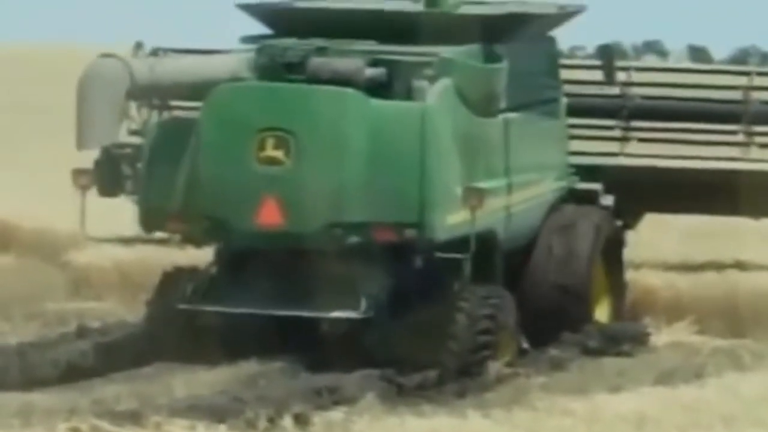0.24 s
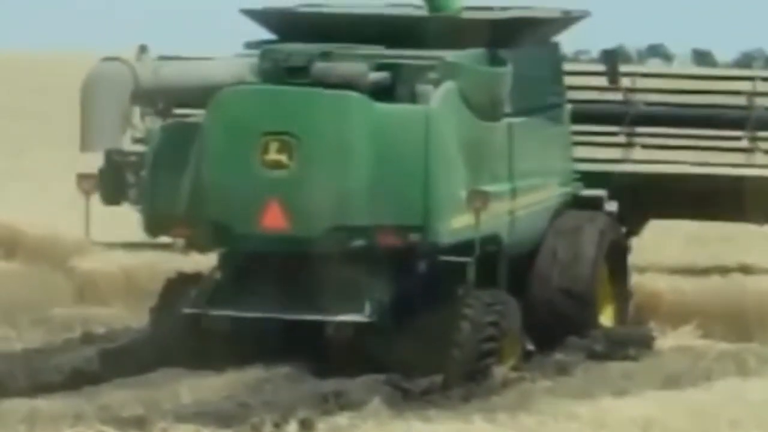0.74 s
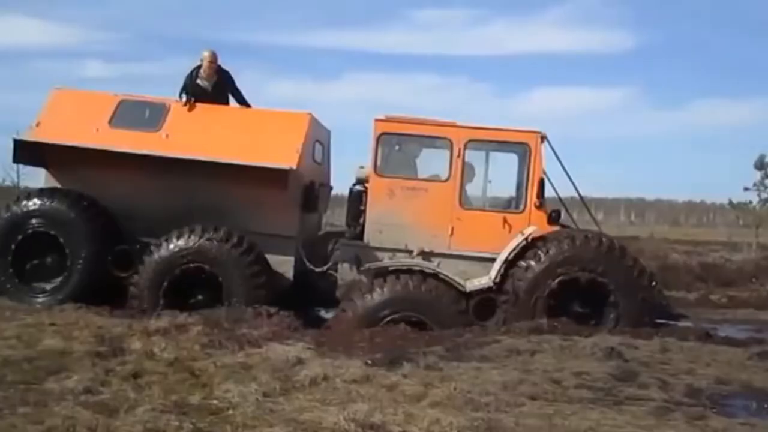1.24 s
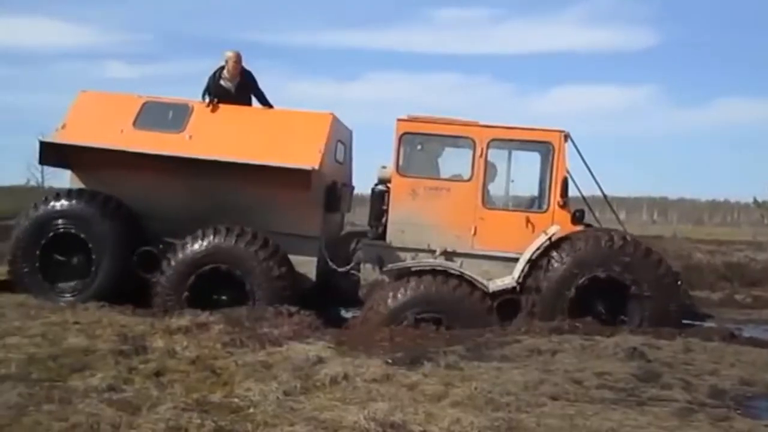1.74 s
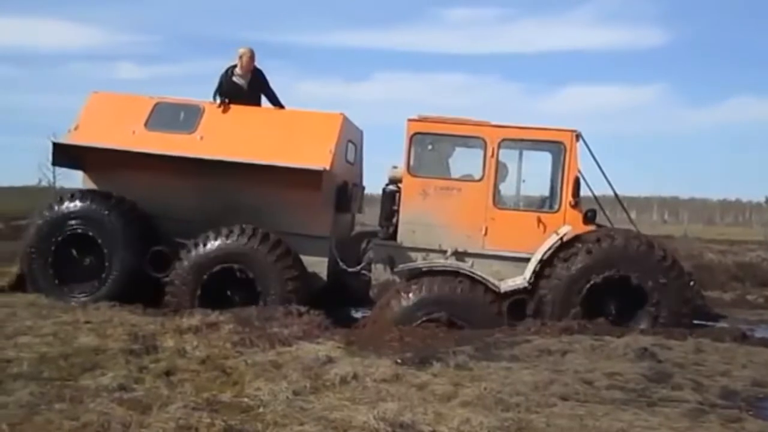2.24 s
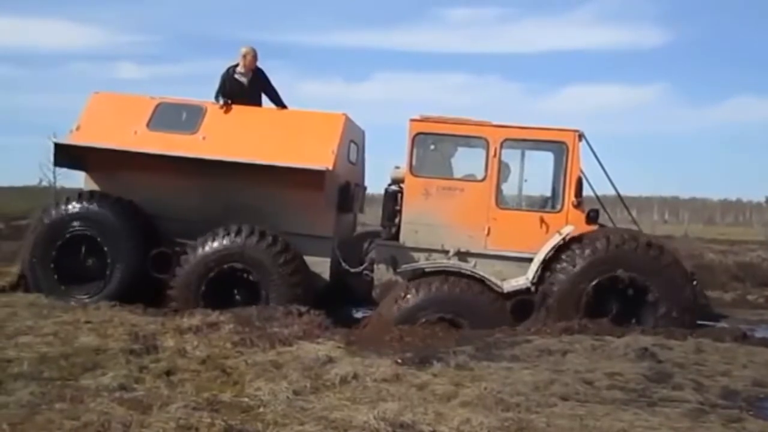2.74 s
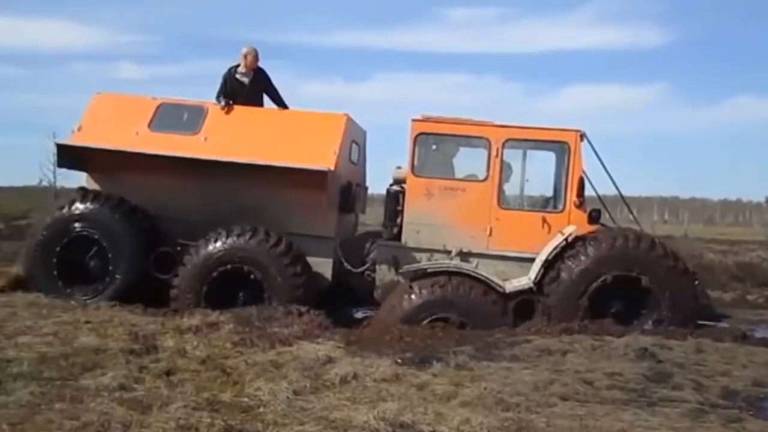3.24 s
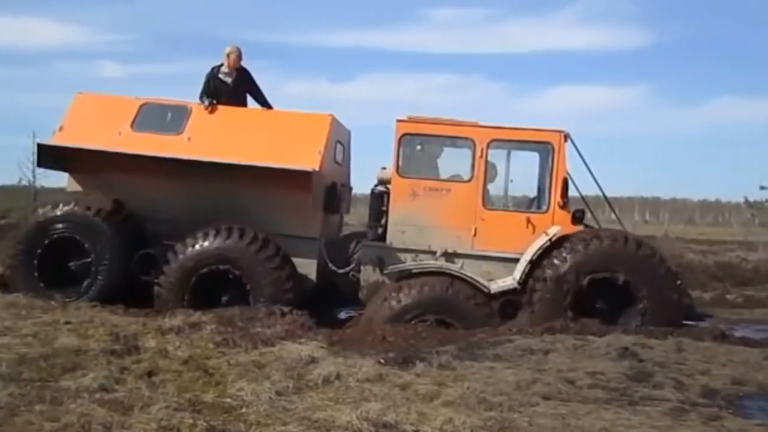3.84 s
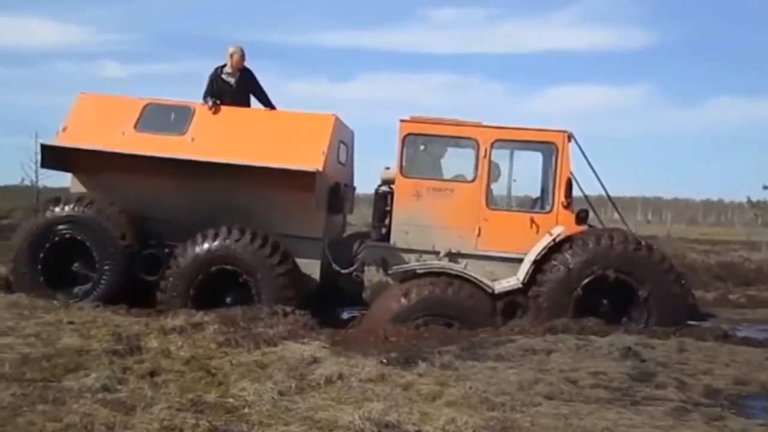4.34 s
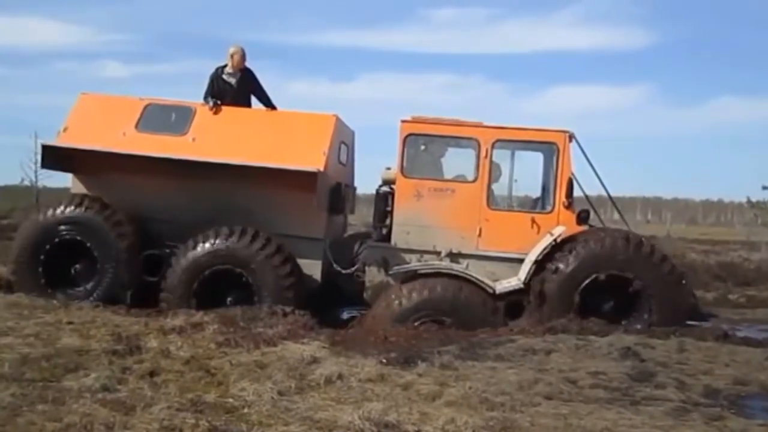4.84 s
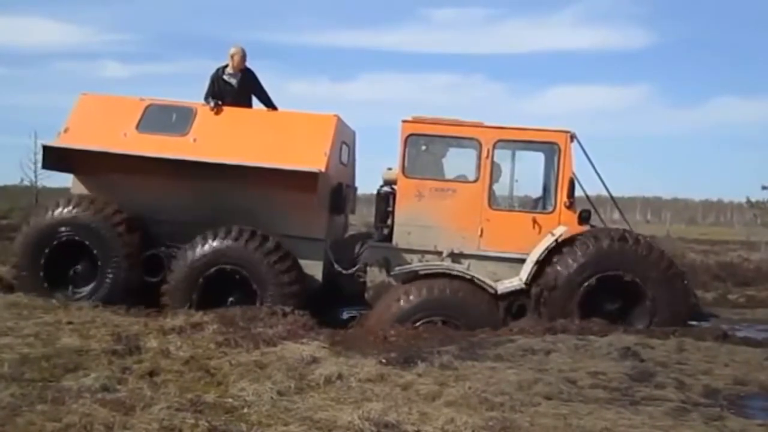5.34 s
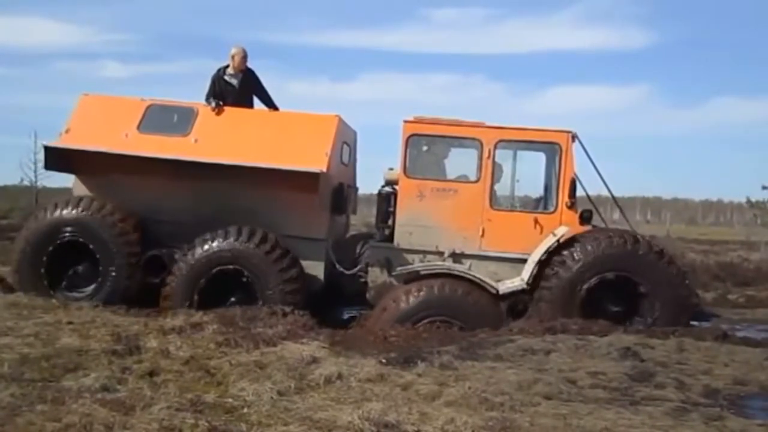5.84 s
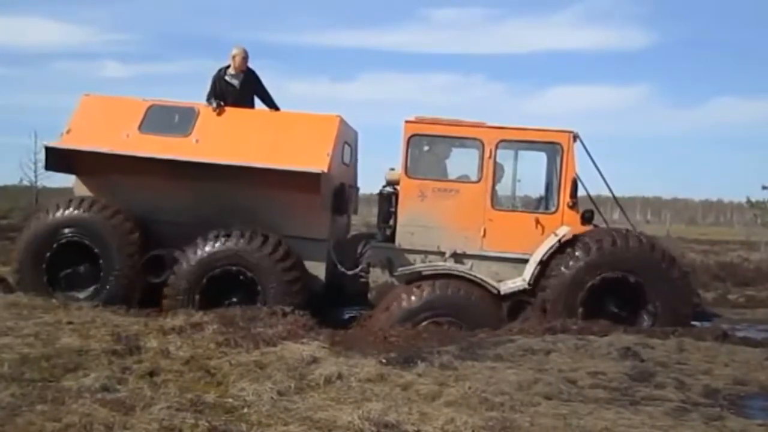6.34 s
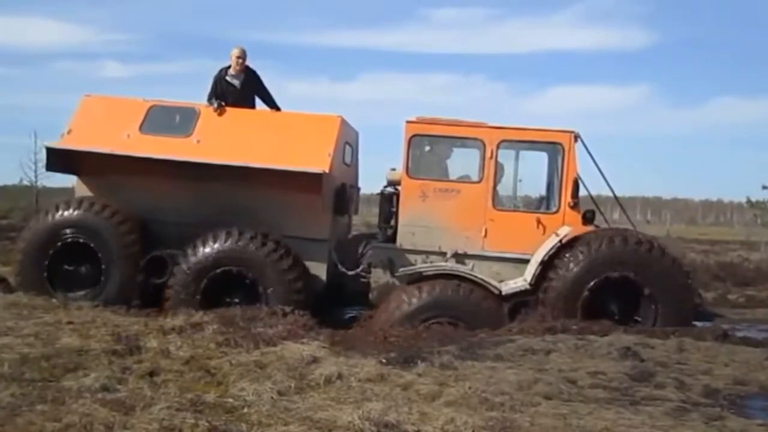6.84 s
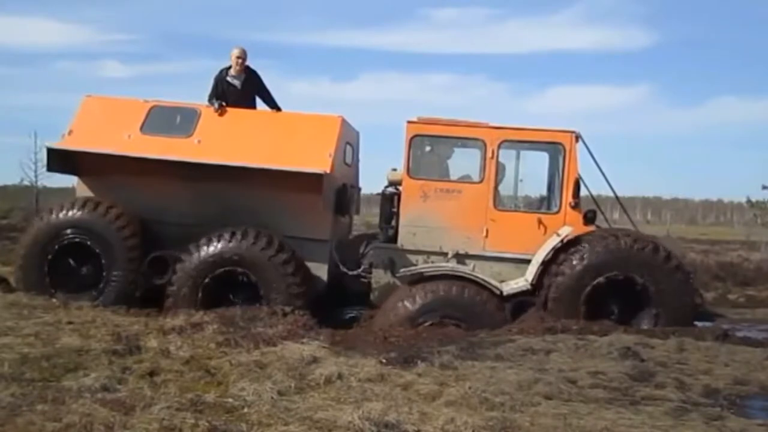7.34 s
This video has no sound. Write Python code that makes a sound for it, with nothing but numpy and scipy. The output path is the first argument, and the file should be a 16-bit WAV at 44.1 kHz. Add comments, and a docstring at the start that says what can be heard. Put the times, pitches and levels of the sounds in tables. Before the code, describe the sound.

A combine harvester runs loudly in a field, its diesel engine droning, throbbing and whining through a dull, overdriven microphone. After about a second it cuts abruptly to a much quieter swamp truck crawling through a bog. That engine clatters, revs up with a hiss, then sags and grows louder under load. Dull knocks come from the body, mud splatters faintly, and wind rumbles on the microphone toward the end.

```python
"""In a muddy field a combine harvester labours: its rotor throbs and its diesel drones and whines,
heard through a dull, overdriven microphone. The scene changes abruptly to a bog, where a six-wheeled
swamp truck crawls. Its four-cylinder engine revs up with a hiss, then sags under load and grows louder.
Periodic firing gives the exhaust tones and forces panels to ring; blows excite the body's damped modes.
Mud splatters, eddies buffet the microphone, and a low rumble swells like gusting wind."""
import sys
import numpy as np
from scipy import signal
from scipy.fft import rfft, irfft, next_fast_len
from scipy.io import wavfile
from scipy.ndimage import uniform_filter1d, map_coordinates

SR = 44100
rng = np.random.default_rng(int(sys.argv[2]) if len(sys.argv) > 2 else 0)


def wav_record(signal):
    """Record a signal, one row per channel, as 16-bit PCM in the file named by sys.argv[1]."""
    frames = np.transpose(np.atleast_2d(signal))
    bounded = np.clip(frames, -1, 1)
    # unit amplitude maps onto the largest positive 16-bit level
    quanta = np.round(bounded * 32767).astype(np.int16)
    wavfile.write(sys.argv[1], SR, quanta)


N = 334703
TIME_S = np.arange(N) / SR


def amp(db):
    """Amplitude ratio of a level in decibels."""
    return 10 ** (np.asarray(db) / 20)


def unit(x):
    """Normalisation to rms 1."""
    return x / np.sqrt(np.mean(x ** 2) + 1e-20)


def noise():
    """White Gaussian noise."""
    return rng.standard_normal(N)


def curves(rows):
    """Linear interpolation in time of each column after the first."""
    times, *columns = np.transpose(rows)
    return [np.interp(TIME_S, times, column) for column in columns]


def wobble(rate):
    """Smooth random modulation with rate knots a second."""
    knots = rng.standard_normal(int(N * rate / SR) + 4)
    return map_coordinates(knots, [TIME_S * rate])


def bell(middle_s, half_s):
    """Gaussian envelope with a peak of 1."""
    return np.exp(-.5 * ((TIME_S - middle_s) / half_s) ** 2)


def swell(t, rise_s):
    """Critically damped envelope: it reaches 1 at rise_s, then decays."""
    return t / rise_s * np.exp(1 - t / rise_s)


def filtered(x, response):
    """Linear filtering: the spectrum times a frequency response."""
    size = next_fast_len(N + SR // 2)
    return irfft(rfft(x, size) * response(np.fft.rfftfreq(size, 1 / SR)), size)[:N]


def shaped(x, points):
    """Spectral envelope through (frequency_hz, level_db) points."""
    f, db = np.transpose(points)
    return filtered(x, lambda hz: amp(np.interp(np.log(hz + 1), np.log(f), db)))


def coloured(x, points):
    """Spectral shaping at rms 1."""
    return unit(shaped(x, points))


def resonant(x, peaks):
    """Resonance: phase lag at each (centre_hz, width_hz, level_db) peak spreads a pulse into a ring."""
    def response(f):
        power = sum(amp(2 * db) * (f * width) ** 2 / ((hz * hz - f * f) ** 2 + (f * width) ** 2)
                    for hz, width, db in peaks)
        lag = 2 * sum(np.arctan2(f * width, hz * hz - f * f) for hz, width, _ in peaks)
        return np.sqrt(power) * np.exp(-1j * lag)
    return unit(filtered(x, response))


def patchy(x, depth_db):
    """Turbulence: bands a few hundred Hz wide swell and fade."""
    spectrum = signal.stft(x, nperseg=512)[2]
    field = uniform_filter1d(rng.standard_normal(spectrum.shape), size=5, axis=0)
    field = uniform_filter1d(field, size=45, axis=1)
    return signal.istft(spectrum * amp(depth_db * unit(field)), nperseg=512)[1][:N]


def tones(cycles, orders, flutter_db, flutter_rate):
    """Order tones: sinusoids at multiples of a cycle rate, each randomly amplitude modulated."""
    return sum(np.sqrt(2) * amp(db + flutter_db * wobble(flutter_rate))
               * np.sin(2 * np.pi * (order * cycles + rng.random())) for order, db in orders)


def firings(cycles, uneven, cylinders):
    """Pulse train, one pulse a firing; unequal cylinders add subharmonics."""
    stroke = np.floor(cycles).astype(int)
    strengths = 1 + uneven * rng.standard_normal(cylinders)
    return np.diff(stroke, prepend=0) * strengths[stroke % cylinders]


# Microphone ticks: middle_s, level_db
OVERLOAD_TICKS = [(.486, -48.5), (.691, -52.5)]

def overload(half_s=0.00088):
    """Brief transients are broadband: the overdriven microphone ticks faintly."""
    envelope = sum(amp(db) * bell(middle_s, half_s) for middle_s, db in OVERLOAD_TICKS)
    return envelope * coloured(noise(), [(2000, -4.5), (5000, -3.5), (12000, -24.5)])


# Spectrum of flung mud: frequency_hz, level_db
SPRAY_SPECTRUM = [(1500, -14.5), (3000, -3.5), (4200, -2), (5600, -1), (7500, -19), (10000, -19.5),
                  (14000, -23)]

def spray(middle_s=4.81, half_s=0.14, level_db=-41):
    """Many small impacts merge into noise: wet mud hisses off the tyres."""
    hiss = patchy(coloured(noise(), SPRAY_SPECTRUM), depth_db=4)
    return amp(level_db) * bell(middle_s, half_s) * hiss


# Clods of mud landing: start_s, level_db, centre_hz
CLODS = [(3.18, -45, 5495), (5.275, -39.5, 6000), (5.712, -39, 5450), (5.762, -37.5, 5520),
         (5.9, -37, 4550), (5.921, -35, 5020), (6.222, -29.5, 2960), (6.378, -35, 1350), (6.439, -28, 1290)]

def splats(rise_s=0.0051, skirt_db=-13):
    """Soft impacts give bursts of band noise: a short hiss or a lower squelch."""
    out = np.zeros(N)
    for start_s, db, hz in CLODS:
        band = [(hz / 8, -40), (hz / 2, skirt_db), (hz, 0), (hz * 2, skirt_db), (hz * 8, -40)]
        out += amp(db) * swell(np.maximum(TIME_S - start_s, 0), rise_s) * coloured(noise(), band)
    return out


# Evenly spaced peaks in the engine's hiss: centre_hz, width_hz, level_db
HISS_PEAKS = [(5470, 800, 1), (7600, 680, -1), (9940, 750, -2), (12100, 750, -6)]
# Strength of the whistling hiss: time_s, level_db
WHISTLE_LEVEL = [(1.3, -71.5), (2.0, -55.5), (2.25, -76), (2.85, -67), (3.5, -55.5), (4.05, -52.5),
                 (4.4, -54), (4.8, -44.5), (5.12, -47.5), (5.25, -65), (6.7, -49.5), (7.59, -44.5)]
# The peaks rise twice: time_s, pitch_ratio
WHISTLE_PITCH = [(3.2, 1), (3.45, 1.1), (3.7, 1.21), (4.0, 1.13), (4.3, 1.02), (4.58, .99), (4.85, 1.11),
                 (5.1, 1.08), (6.9, .98)]

def whistling_hiss():
    """Comb-like spectrum, as from a ground reflection: engine hiss whose broad peaks glide together."""
    level_db, = curves(WHISTLE_LEVEL)
    pitch_ratio, = curves(WHISTLE_PITCH)
    gliding = map_coordinates(resonant(noise(), HISS_PEAKS), [np.cumsum(pitch_ratio)], mode="wrap")
    air = coloured(gliding, [(2500, -23), (5200, -3.5), (5900, 0), (6700, -13), (7700, -5.5),
                             (8600, -1), (9500, -4.5), (11000, -6.5), (14000, -14)])
    return amp(level_db) * patchy(air, depth_db=2.5)


# Wind eddies: start_s, level_db, starting_pitch_hz
EDDIES = [(1.502, -10.5, 197), (1.531, -17, 278), (1.55, -14, 207), (1.604, -23.5, 174), (1.631, -27, 160),
          (2.115, -21.5, 68.4), (2.139, -17.5, 70), (2.223, -25, 83.5), (2.324, -27, 72),
          (2.529, -20.5, 134), (2.54, -19.5, 55), (2.66, -28, 141), (2.736, -26.5, 78), (4.196, -22.5, 60),
          (4.268, -14, 103), (5.133, -17.5, 100), (5.55, -19, 123), (5.722, -21, 181), (5.876, -21, 287),
          (5.924, -13.5, 122), (6.121, -12.5, 95), (6.16, -11, 84.6), (6.337, -10.5, 131),
          (6.396, -21, 130), (6.438, -13, 165), (6.494, -12, 217), (6.587, -14, 141), (6.655, -14, 170),
          (6.682, -14, 148), (6.745, -12.5, 85), (7.344, -15, 74)]
# Spectrum of an eddy's puff: frequency_hz, level_db
PUFF_SPECTRUM = [(12, -20), (35, -14), (110, -2), (200, 0.5), (330, -10), (700, -30), (2000, -90)]

def buffets(rise_s=0.0087, swing_db=-3, puff_db=-13, sag_octaves_per_s=6):
    """Pressure fluctuation: each eddy on the microphone gives a few sinking swings and a low puff."""
    t = np.arange(SR // 8) / SR
    out = np.zeros(N + len(t))
    puffs = coloured(noise(), PUFF_SPECTRUM)
    for start_s, db, hz in EDDIES:
        start = round(start_s * SR)
        here = slice(start, start + len(t))
        swing = np.sin(2 * np.pi * np.cumsum(hz * 2 ** (-sag_octaves_per_s * t)) / SR)
        out[here] += amp(db) * swell(t, rise_s) * (amp(swing_db) * swing + amp(puff_db) * puffs[here])
    return out[:N]


# Truck engine speed: time_s, firing_hz
FIRING_RATE = [(1.25, 70.3), (1.7, 72.4), (2.05, 77.4), (2.8, 67.5), (3.3, 68.3), (4.5, 80.7), (5.0, 84.4),
               (5.75, 66.7), (6.9, 61.2), (7.59, 64.8)]
# How hard the truck works: time_s, effort_db
ENGINE_EFFORT = [(1.3, -48.5), (3.24, -42.5), (4.77, -35), (5.87, -33), (6.41, -29), (6.68, -31.5),
                 (7.59, -27.5)]

def drive(cruise_hz=70):
    """Speed and load govern engine noise: firing rate, effort, and revs in octaves above cruising."""
    firing_hz, = curves(FIRING_RATE)
    effort_db, = curves(ENGINE_EFFORT)
    return firing_hz, effort_db, np.log2(firing_hz / cruise_hz)


# Low swells, like wind gusting on the microphone: middle_s, half_length_s, rumble_db, shudder_db
LOW_SWELLS = [(1.55, 0.035, -50, -25.5), (3.25, .3, -54, -48), (4.166, 0.24, -36.5, -60),
              (5.8, 0.23, -28.5, -32), (6.297, 0.27, -33, -35), (6.577, 0.11, -28.5, -23.5)]
# Spectrum of the rumble: frequency_hz, level_db
RUMBLE_SPECTRUM = [(12, -25), (30, 1.5), (60, 0.5), (110, 3), (200, -2.5), (320, -7.5), (500, -15.5),
                   (1000, -29.5), (3000, -81.5)]
# Spectrum of the shudder: frequency_hz, level_db
SHUDDER_SPECTRUM = [(60, -20), (130, 4), (185, -3.5), (270, -1), (400, -10), (600, -17), (1000, -36),
                    (3000, -77.5)]

def rumble(roar_db=1.0, shake_db=-12.5, lug_db_per_octave=9, lumpy_db=2.5, rattle_db=7.0):
    """Incoherent noises add in power: rumble and shudder follow the truck's strain and swell in gusts."""
    _, effort_db, revs = drive()
    strain = amp(effort_db - lug_db_per_octave * revs)
    swell_power = sum((amp([[rumble_db], [shudder_db]]) * bell(middle_s, half_s)) ** 2
                      for middle_s, half_s, rumble_db, shudder_db in LOW_SWELLS)
    roar_swell, shudder_swell = np.sqrt(swell_power)
    roar = unit(amp(lumpy_db * wobble(45)) * coloured(noise(), RUMBLE_SPECTRUM))
    swing = np.tanh(wobble(110))  # fast flutter of limited depth
    shudder = coloured(amp(rattle_db * swing) * noise(), SHUDDER_SPECTRUM)
    return (np.hypot(amp(roar_db) * strain, roar_swell) * roar
            + np.hypot(amp(shake_db) * strain, shudder_swell) * shudder)


# Modes of the truck's body: pitch_hz, level_db, t60_s
BODY_MODES = [(127, -2, 0.076), (251, -1, 0.063), (296, -6.5, 0.046), (377, -14, 0.053), (623, -14, 0.054),
              (763, -17.5, 0.096)]

def thud(t, clack_db, pitch_ratio, ring_ratio, hard_db=-17):
    """Modal decay: one push starts all modes; harder contact favours the upper ones."""
    ring = np.zeros(len(t))
    for hz, db, t60_s in BODY_MODES:
        brightness_db = (clack_db - hard_db) * max(np.log2(hz / 250), 0)
        pitch_hz = pitch_ratio * hz * (1 + rng.normal(0, .025))
        envelope = amp(db + brightness_db + rng.normal(0, 1.0) - 60 * t / (t60_s * ring_ratio))
        ring += envelope * np.cos(2 * np.pi * pitch_hz * t)
    return ring


# Blows: start_s, level_db, relative_clack_db, relative_tick_db, pitch_ratio, clack_top_hz, ring_ratio
BLOWS = [(1.219, 0, -19.5, -32.5, 0.92, 1400, 1.38), (1.508, 0, -26, -38, 0.96, 3500, 1.06),
         (1.536, -9, -21, -19, 0.98, 2500, 1.6), (1.556, -7, -16.5, -32.5, 0.98, 1700, 1.03),
         (1.659, -16, -14, -34, 1.33, 800, 0.37), (1.733, -16.5, -21.5, -30.5, 0.99, 1100, 1.1),
         (2.138, -16, -32, -42.5, 0.77, 900, 1.4), (2.222, -24, -30, -40.5, 0.77, 700, 1),
         (2.269, -18, -28, -35.5, 0.74, 900, 0.81), (2.505, -12, -29, -35.5, 0.8, 700, .7),
         (2.557, -22, -28, -40.5, 1.6, 700, 0.79), (2.59, -16, -13.5, -20.5, 0.91, 1090, 1.35),
         (3.1, -2, -15.5, -28.5, 0.92, 3000, 0.94), (3.212, -10, -17.5, -23, .98, 1300, 0.96),
         (3.673, -5.5, -15.5, -23.5, .92, 1500, 1.03), (4.274, -10, -31, -32, 0.59, 700, 1),
         (6.314, -3, -21, -35, 0.89, 900, 0.68), (6.458, -7.5, -18, -33.5, 1, 1400, 0.71),
         (6.471, -2, -24, -37.5, 0.95, 700, 0.46), (6.523, -3, -16, -30.5, 0.85, 800, 0.65),
         (6.562, 1.5, -26, -31.5, 0.91, 900, 0.35), (6.589, -9, -23, -33, 1.2, 800, 0.61),
         (6.614, -2, -17, -35, 0.92, 900, .5), (6.646, -7.5, -21, -37.5, 1.4, 700, 0.39),
         (6.677, -7, -19, -31, 1.22, 700, 0.45), (6.736, -13.5, -21.5, -35, 1, 700, 0.81),
         (6.764, -7, -32, -39, 0.67, 700, 1.2), (7.14, -13.5, -19, -36.5, 0.96, 700, 1)]
# Spectrum of the contact's clack: frequency_hz, level_db
CLACK_SPECTRUM = [(190, -15), (300, 10.5), (560, -11), (780, 5), (1100, 1.5), (1230, -7), (1420, -2),
                  (2100, -8), (3500, -22), (8000, -55)]
# Spectrum of the contact's tick: frequency_hz, level_db
TICK_SPECTRUM = [(1000, -14), (3000, 1), (8000, -3), (14000, -14.5)]

def knocks(thud_db=-6, clack_gain_db=2, tick_gain_db=-2,
           clack_t60_s=0.057, tick_t60_s=0.045, attack_s=0.00095):
    """Impact excitation: the heavily damped body thuds, with a muffled clack and a faint tick."""
    t = np.arange(SR // 4) / SR
    out = np.zeros(N + len(t))
    clacks, ticks = coloured(noise(), CLACK_SPECTRUM), coloured(noise(), TICK_SPECTRUM)
    for start_s, db, clack_db, tick_db, pitch_ratio, top_hz, ring_ratio in BLOWS:
        start = round(start_s * SR)
        here = slice(start, start + len(t))
        body = amp(thud_db) * thud(t, clack_db, pitch_ratio, ring_ratio)
        muffled = signal.sosfilt(signal.butter(4, top_hz, fs=SR, output="sos"), clacks[here])
        clack = amp(clack_db + clack_gain_db - 60 * t / (clack_t60_s * ring_ratio)) * muffled
        tick = amp(tick_db + tick_gain_db - 60 * t / tick_t60_s) * ticks[here]
        out[here] += amp(db) * (body + clack + tick) * (1 - np.exp(-t / attack_s))
    return out[:N]


# Threshing rotor and the shafts belted to it: rotor_multiple, level_db
ROTOR_ORDERS = [(1, -15), (1.5, -25.5), (3, -16), (4, -25), (5.35, -21.5), (6, -23), (7.9, -26.5),
                (9, -30.5), (11.25, -29.5), (12.3, -29.5)]
# Fan, gear and exhaust tones: pitch_hz, level_db
WHINE_TONES = [(328.4, -35.5), (538.3, -43.5), (694.4, -41.5), (872.6, -35), (1055, -49.5), (1157, -53),
               (1206, -47.5), (1330, -60.5), (1384, -51), (1615, -52), (1701, -60.5), (1787, -67.5),
               (2213, -54), (2713, -54.5)]
# Response of the harvester's casing: frequency_hz, level_db
CASING_SPECTRUM = [(160, -3.5), (280, 1), (330, -0.5), (400, -4), (450, -6.5), (680, -4), (760, -10),
                   (890, -7), (1120, -13), (1550, -16.5), (1800, -18), (2150, -15), (2700, -19.5),
                   (3650, -28.5), (4000, -43)]
# The harvester's low roar: frequency_hz, level_db
CHURN_SPECTRUM = [(12, -20.5), (28, 1.5), (60, 0), (100, -0.5), (135, 1), (185, 0.5), (205, -9),
                  (265, -10.5), (330, -40), (500, -44), (1000, -81.5)]

def harvester(rotor_hz=14.55, firing_hz=109.1, drift=0.0011,
              drone_db=-34, straw_db=-27, churn_db=-19, beat_db=-0.5):
    """Rotating machinery at governed speed: throb, whine and diesel drone over rushing straw."""
    clock_s = np.cumsum(1 + drift * wobble(5.7)) / SR  # everything is belted to one crankshaft
    throb = tones(rotor_hz * clock_s, ROTOR_ORDERS, flutter_db=1.2, flutter_rate=5.2)
    whine = tones(clock_s, WHINE_TONES, flutter_db=-1.3, flutter_rate=8.1)
    pulses = firings(firing_hz * clock_s, uneven=0.1, cylinders=6)
    drone = amp(drone_db) * coloured(pulses, CASING_SPECTRUM)
    straw = amp(straw_db + 0.32 * wobble(17)) * coloured(noise(), CASING_SPECTRUM)
    beat = np.sin(2 * np.pi * rotor_hz * clock_s)  # the roar swells once a rotor turn
    churn = amp(churn_db + beat_db * beat + wobble(22)) * coloured(noise(), CHURN_SPECTRUM)
    return throb + whine + drone + straw + churn


# The truck engine's air hiss: frequency_hz, level_db
HISS_SPECTRUM = [(1500, -30.5), (3800, 0.5), (5000, 3), (5750, 2), (6600, -2), (7600, -1), (8600, 0.5),
                 (9500, -3.5), (11000, -7.5), (14500, -21.5)]

def air_hiss(cycles, revs, gain_db=-12.0, db_per_octave=8, decay_db=6.5, whine_hz=6477, whine_db=-21):
    """Pulsed turbulent flow: hiss flares at each firing and grows with revs, around a faint tone."""
    bursts = noise() * amp(-decay_db * (cycles % 1))
    hiss = patchy(coloured(bursts, HISS_SPECTRUM), depth_db=1.5)
    whine = amp(whine_db) * np.sin(2 * np.pi * whine_hz * TIME_S)
    return amp(gain_db + db_per_octave * revs + wobble(30)) * (hiss + whine)


# Clatter of the engine block: frequency_hz, level_db
BLOCK_SPECTRUM = [(100, -31), (250, -7.5), (420, -3.5), (580, -8.5), (1000, -3), (1210, -8), (1500, -2.5),
                  (2160, -10), (2500, -10.5), (3500, -10), (4500, -14.5), (7000, -21), (14000, -35.5)]
# Engine bay resonances: centre_hz, width_hz, level_db
PANEL_MODES = [(437.7, 50, 1.5), (643, 35, -3.5), (780, 40, 3.5), (911, 12.5, 2), (1009, 53, 0.5),
               (1076, 61, 3), (1364, 34.5, 0.5), (1446, 57, -0.5), (1640, 32, -1.5), (1891, 31, -2),
               (1994, 64, -2), (2280, 38, -4.5), (2433, 61, -3), (2640, 40, -8.5), (2778, 110, -5.5),
               (3067, 53, -7.5), (3735, 54, -7.5), (4090, 57, -9.5)]
# Housings that ring out at high revs: centre_hz, width_hz, level_db
HOUSING_MODES = [(434, 70, 3.5), (1350, 130, 1.5), (2465, 150, -3.5)]

def clatter(cycles, revs, block_db=-4, howl_db=-18, howl_db_per_octave=40, firing_share=.36):
    """Forced resonance: firings and random shaking ring panels and housings over the block's noise."""
    block = amp(block_db) * coloured(noise(), BLOCK_SPECTRUM)
    shaking = np.sqrt(1 - firing_share) * noise()
    shaking += np.sqrt(firing_share) * unit(firings(cycles, uneven=0.25, cylinders=4))
    ringing = resonant(shaking, PANEL_MODES)
    panels = coloured(ringing, [(200, -6.5), (450, -0.5), (4200, -3.0), (8000, -21.5)])
    howl = amp(howl_db + howl_db_per_octave * revs) * resonant(shaking, HOUSING_MODES)
    return amp(0.8 * wobble(35)) * (block + panels + howl)


# Exhaust tones: firing_multiple, level_db
EXHAUST_ORDERS = [(1, 1.5), (1.5, -14), (2, 2), (2.5, -4), (3, -6.5), (4, -12.5), (5, -25.5), (5.5, -32),
                  (6.5, -27)]
# Response of the pipe: frequency_hz, gain_db
MUFFLER_RESPONSE = [(60, -0.5), (90, -1), (125, 1.5), (170, -3.5), (230, -6.5), (330, 6), (450, 8.5)]

def exhaust(cycles, effort_db, revs, gain_db=-9.0, growth=0.78, lug_db_per_octave=14, lope_db=0.9):
    """Source and filter: firing tones pass through the muffler and boom when the engine lugs."""
    lope = np.cos(np.pi / 2 * cycles)  # one surge in four firings
    orders = tones(cycles, EXHAUST_ORDERS, flutter_db=3.3, flutter_rate=36)
    level_db = gain_db + growth * effort_db - lug_db_per_octave * revs + lope_db * lope
    return amp(level_db) * shaped(orders, MUFFLER_RESPONSE)


def truck_engine(jitter=.005, gear_ratio=4 / 3, gear_db=-47):
    """Phase locking: one firing cycle times exhaust, gear hum, clatter and hiss."""
    firing_hz, effort_db, revs = drive()
    cycles = np.cumsum(firing_hz * (1 + jitter * wobble(24))) / SR
    boom = exhaust(cycles, effort_db, revs)
    hum = tones(cycles, [(gear_ratio, gear_db)], flutter_db=0, flutter_rate=10)  # even at any load
    return boom + hum + amp(effort_db) * (clatter(cycles, revs) + air_hiss(cycles, revs))


def scene(change_s=1.222, crossfade_s=0.012, harvester_top_hz=4000):
    """Superposition: the clipped, band-limited harvester gives way to the truck's summed sources."""
    fade_in = np.sin(np.pi / 2 * np.minimum(TIME_S / .004, 1)) ** 2
    truck_share = np.clip((TIME_S - change_s) / crossfade_s + .5, 0, 1)
    overdriven = np.clip(fade_in * harvester(), -.97, .97)
    field = filtered(overdriven, lambda hz: hz < harvester_top_hz) + overload()
    truck = truck_engine() + whistling_hiss() + spray() + splats() + rumble() + buffets()
    return ((1 - truck_share) * field + truck_share * truck + knocks())[None]


def record(dry, top_hz=14650):
    """Saturation and band limiting: the highest swings clip, and nothing passes above top_hz."""
    return filtered(np.clip(dry[0], -1, 1), lambda hz: hz < top_hz)[None]


dry = scene()
out = record(dry)
wav_record(out)
```